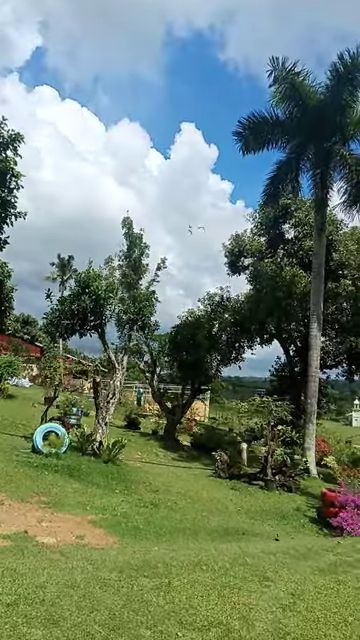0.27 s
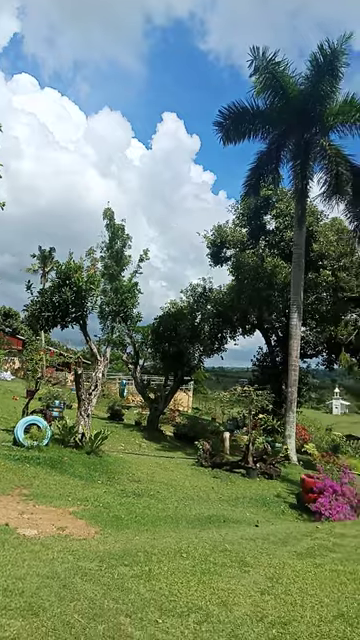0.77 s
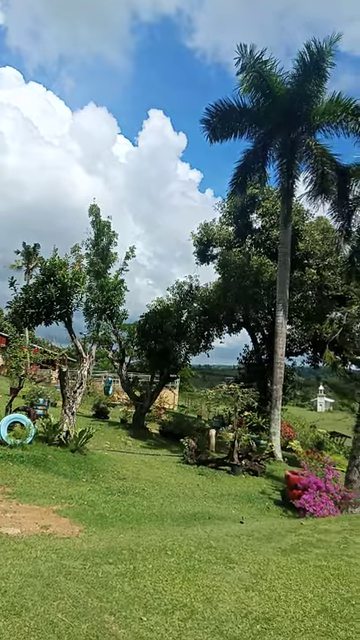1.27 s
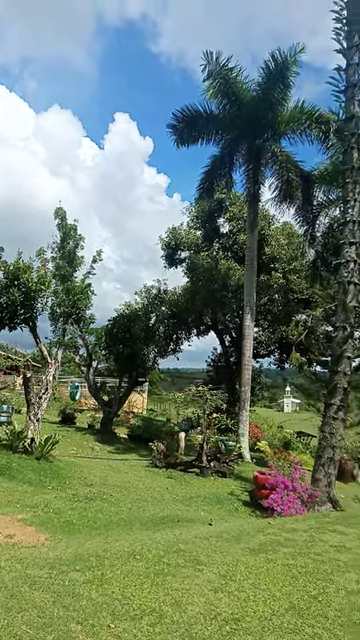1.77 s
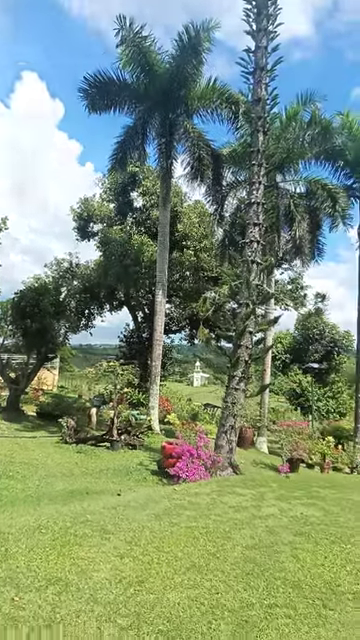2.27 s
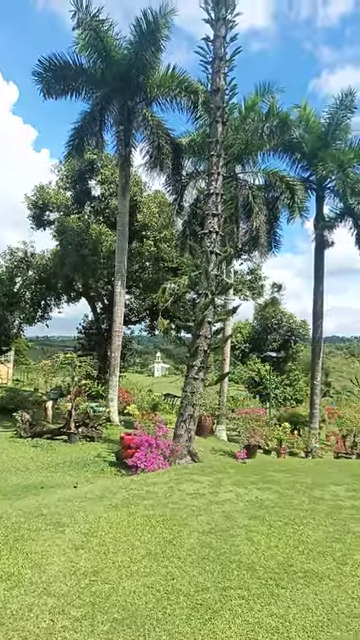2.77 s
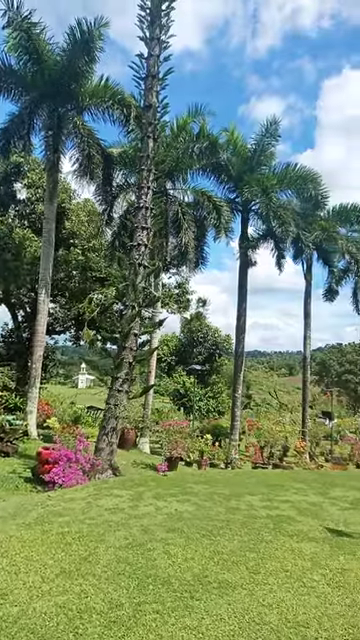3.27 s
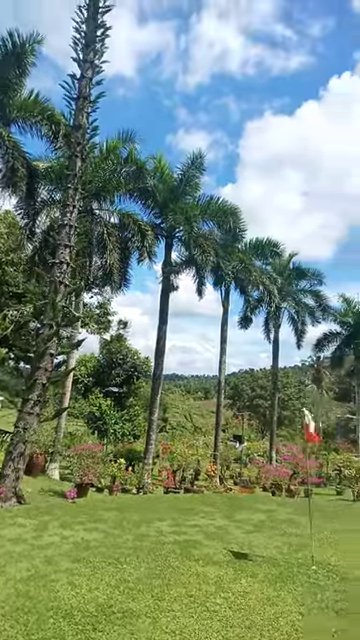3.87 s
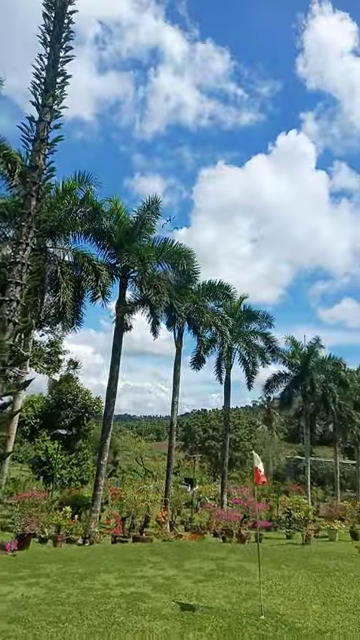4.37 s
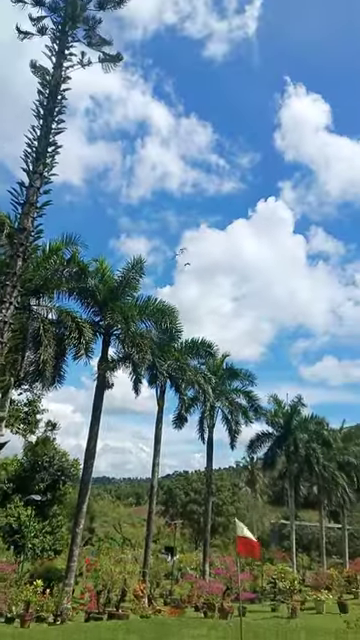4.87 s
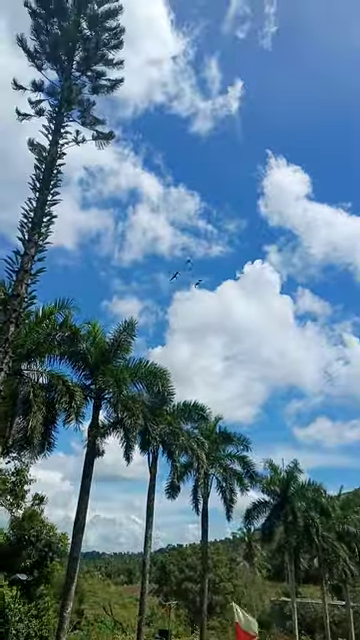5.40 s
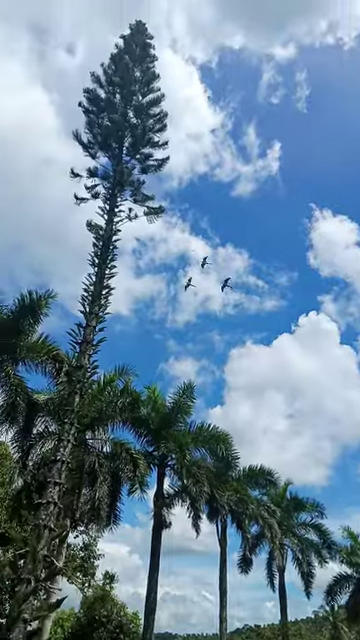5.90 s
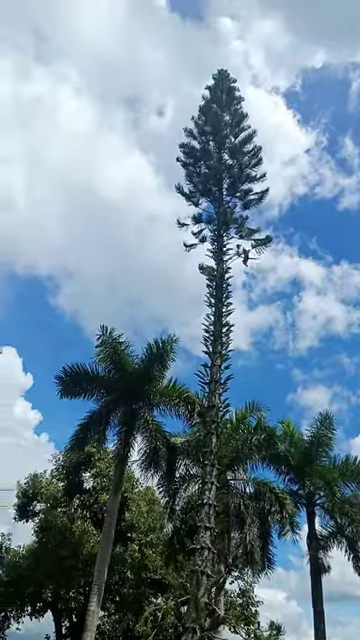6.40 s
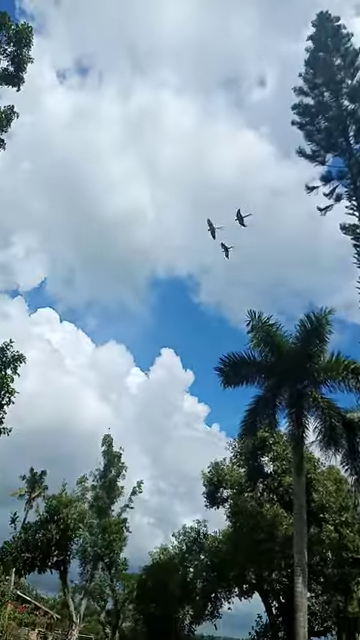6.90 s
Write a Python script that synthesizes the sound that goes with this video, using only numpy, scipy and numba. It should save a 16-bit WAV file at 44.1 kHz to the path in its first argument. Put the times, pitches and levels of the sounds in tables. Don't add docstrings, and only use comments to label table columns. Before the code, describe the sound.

Harsh parrot screeches and grating squawks ring out overhead outdoors, over low wind buffeting, soft leaf rustle and a faint distant hum.

```python
import sys
import numpy as np
from scipy import signal
from scipy.fft import rfft, irfft
from scipy.io import wavfile
from scipy.ndimage import uniform_filter1d, minimum_filter1d
from numba import njit

SR = 44100
rng = np.random.default_rng(int(sys.argv[2]) if len(sys.argv) > 2 else 0)


def transcribe(u):
    v = np.clip(np.atleast_2d(u).T, -1, 1)
    q = np.round(v * 32767).astype(np.int16)
    wavfile.write(sys.argv[1], SR, q)


def amplitude_ratio(level_db):
    exponent = np.asarray(level_db, float) / 20
    return 10 ** exponent


N = 315178
T = np.arange(N) / SR

# t/s, level/dB
WIND = [(0, -41.5), (.6, -42.5), (1.6, -39.5), (2.3, -41.5), (2.6, -40.5), (3.4, -45.5), (3.5, -34.5),
        (4.1, -40), (4.5, -33), (5.2, -34), (5.7, -38.5), (6.5, -33.5), (7.15, -38)]
# t/s, level over the wind/dB, half width/s
BUFFETS = [
    (4.4, 5.5, 0.04),
    (4.54, 7, 0.1),
    (5.49, 10.5, 0.11),
    (5.75, 10, 0.15),
    (6.18, 14, 0.16),
    (6.89, 10.5, 0.22),
]
# f/Hz, level/dB
RUMBLE = [(12, -61), (20, -26), (37, -26.5), (54, -7.5), (75, 3.5), (147, 1), (195, -6), (354, -23),
          (600, -18), (780, -33.5), (1320, -120)]
# t/s, level over the leaves/dB, half width/s
RUSTLES = [
    (2.31, 5.5, 0.23),
    (3.58, 2.5, 0.12),
    (4.5, 4.5, 0.16),
    (5.72, 4.5, 0.12),
    (6.42, 5.5, 0.19),
    (7.05, 2, 0.08),
    (5.3, -2.5, .2),
]
# f/Hz, level/dB
LEAVES = [(150, -11.5), (250, -3.5), (700, -5.5), (1400, -5.5), (2200, -7), (2800, -6), (3300, -12),
          (4200, -17.5), (5000, -36), (6000, -41), (8000, -51.5), (15500, -68.5)]
# t/s, length/s, f/Hz, level/dB, glide/Hz
WHISTLES = [
    (0.032, .17, 1660, -39.5, 76),
    (0.184, 0.22, 1430, -34.5, -38.5),
    (0.312, 0.15, 1760, -39.5, -75.5),
    (1.745, .22, 1615, -30, -39),
    (4.072, .09, 4240, -32, -500),
    (6.5, 0.29, 1195, -43, 0),
]
# t/s, length/s, pulse rate/Hz, throat f/Hz, level/dB
CROAKS = [
    (0.52, 0.59, 123.8, 1895, -28.5),
    (2.567, 0.26, 73.4, 1790, -35),
    (4.601, .5, 117.5, 2090, -29.5),
]
# t/s, level/dB
CLACKS = [
    (3.666, -22.5),
    (4.301, -22),
    (5.88, -17.5),
    (6.394, -10.5),
    (6.964, -17.5),
]
# t/s, length/s, level/dB, throat f/Hz, beak level/dB
RASPS = [(0.975, 0.021, -25, 2080, -7), (0.997, 0.34, -15.5, 2355, -11), (2.24, 0.57, -35, 2458, -18),
         (3.502, .165, -33.5, 2310, -10.5), (3.664, 0.31, -15.5, 2460, -19), (3.997, .2, -37.5, 2158, 2),
         (4.299, 0.3, -15.5, 2448, -21.5), (4.658, 0.098, -30.5, 2200, -2.5),
         (5.631, .22, -36.5, 2440, -3.5), (5.882, 0.086, -20.5, 2324, -13.5),
         (6.017, 0.18, -17.5, 2310, -10.5), (6.366, 0.028, -18.5, 2450, -4.5),
         (6.395, 0.25, -15, 2378, -10), (6.959, 0.1, -15, 2513, -11.5), (7.101, .06, -13, 2432, -9.5)]
# t/s, length/s
LOCKS = [
    (3.76, .05),
    (4.39, .055),
    (6.07, .09),
    (6.57, .04),
]
BEAK_RANGE_HZ = [1683, 4160]
# t/s, pitch f/Hz, level/dB, beak opening/dB
LONG_SCREAMS = [
    [(0.0, 1298, -11, -15), (0.016, 1242, -12, -1.5), (0.088, 1241, -14, 2.5), (0.1, 1339, -21.5, 1.5),
     (0.196, 1300, -18, 5), (0.21, 1024, -16.5, 0.5), (0.235, 916, -41, 6.5)],
    [(1.575, 1065, -22.5, -4.5), (1.618, 1267, -21, 5), (1.71, 1267, -26.5, 11), (1.76, 1169, -14, -6),
     (1.9, 1113, -14, -6.5), (1.95, 1030, -20.5, -6), (2.05, 981, -26.5, 1), (2.198, 910, -28.5, -8.5),
     (2.22, 734, -34, 4)],
    [(2.862, 937, -35.5, 17), (2.882, 1103, -11.5, -10.5), (2.902, 1177, -13, 0.5), (3.0, 1151, -13.5, -5),
     (3.088, 1151, -11, -9.5), (3.192, 1062, -18.5, -2), (3.25, 1075, -17.5, -5), (3.28, 992, -30, 5),
     (3.3, 778, -35, 1.5)],
]
SHORT_SCREAMS = [
    [(2.8, 649, -38.5, -1.5), (2.826, 712, -23.5, 3.5), (2.833, 754, -14, -8.5), (2.862, 887, -24, 5.2)],
    [(3.97, 1066, -34.5, 10), (4.05, 1018, -34, 14.5), (4.17, 997, -36, 15.5), (4.21, 928, -44.5, 21),
     (4.27, 870, -55.5, 18)],
    [(5.965, 1103, -27, 1), (5.991, 1149, -19, -1.5), (6.02, 1110, -17.5, -9)],
    [(6.15, 1040, -35.5, 14.5), (6.21, 1020, -35, 14.5), (6.384, 1014, -27, 11), (6.4, 1017, -43, 1.5)],
    [(7.04, 1167, -16, -5), (7.074, 1150, -10, -15), (7.098, 1163, -14.5, -4), (7.115, 1216, -9, -19)],
]
# roughness/0-1, tremor depth/0-1, odd partials level/dB
SCREAM_ROUGH = [(.15, .15, 0), (.08, 0, 0), (.06, 0, 0), (.15, 0, 0), (.2, .4, -14), (.1, .1, 0),
                (.17, .45, -14), (.1, .1, 0)]
# f/Hz, level/dB
THROAT = [(1300, -29), (1600, -23), (1830, -1.1), (2700, 1.64), (3100, -15.5), (3600, -10), (4150, -11),
          (4700, -30)]
# f/Hz, level/dB
UPPER = [(4300, 33), (4750, 29), (5150, 10), (5800, 6.5), (6400, 2), (7200, 3), (8500, 1), (10000, -11.5),
         (12000, -12), (15500, -23)]

BEAK_HZ, TOP_HZ = 3424, 6020


def unit(x):
    return x / np.sqrt(np.mean(x ** 2) + 1e-18)


def play(table, fade=0.002):
    s, *columns = np.transpose(table)
    i = np.arange(int(max(s[0], 0) * SR), min(int(s[-1] * SR), N))
    since_start = T[i] - s[0] + (s[0] < .02)
    until_end = s[-1] - T[i] + (s[-1] > T[-1] - .02)
    edge = np.clip(np.minimum(since_start, until_end) / fade, 0, 1)
    return i, [np.interp(T[i], s, c) for c in columns], edge


def span(start, length, fade):
    i, (t,), edge = play([(start, 0), (start + length, length)], fade)
    return i, t, edge


def walk(rate, size):
    k = max(int(SR / rate), 1)
    noise = rng.standard_normal(N + 1)[:size]
    return unit(uniform_filter1d(uniform_filter1d(noise, k), k))


def hiss(size):
    return rng.standard_normal(N)[:size]


def tone(hz):
    return np.sin(2 * np.pi * np.cumsum(hz) / SR)


def bumps(rows):
    return sum(db * np.exp(-((T - s) / width) ** 2) for s, db, width in rows)


def spectrum_db(points, hz):
    f, db = np.transpose(points)
    return np.interp(np.log(hz + 1), np.log(f), db)


def bands(points, flicker_db, rate):
    hz, out = np.arange(N // 2 + 1) * SR / N, 0
    noise = rfft(rng.standard_normal(N)) * amplitude_ratio(spectrum_db(points, hz))
    for centre in np.arange(4, 14.5, .5):
        share = np.clip(1 - 2 * np.abs(np.log2(hz + 1) - centre), 0, 1)
        out = out + irfft(noise * share, N) * amplitude_ratio(flicker_db * walk(rate, N))
    return unit(out)


@njit
def svf(x, hz, width):
    y, b, l = np.empty(len(x)), 0., 0.
    for i in range(len(x)):
        g, k = np.tan(np.pi * hz[i] / SR), width / hz[i]
        v = (b + g * (x[i] - l)) / (1 + g * (g + k))
        b, l, y[i] = 2 * v - b, l + 2 * g * v, k * v
    return y


def ring(x, hz, width_hz):
    hz = hz + np.zeros(len(x))
    once = svf(x, hz, 1. * width_hz)
    return unit(svf(once, hz, 1. * width_hz))


def pulses(hz, jitter, scatter_db):
    chance = rng.standard_normal((N // 20, 2)).T
    cycle = np.cumsum(hz / SR)
    due = np.arange(1, int(cycle[-1])) + 0.
    count = len(due)
    drift = np.cumsum(jitter * chance[0, :count]) * 0.33
    due += drift + jitter * chance[0, 1:count + 1]
    at = np.interp(due, cycle, np.arange(len(hz)) + 0.)
    out, whole = np.zeros(len(hz) + 1), at.astype(int)
    size = amplitude_ratio(scatter_db * chance[1, :count])
    np.add.at(out, whole, size * (1 - at + whole))
    np.add.at(out, whole + 1, size * (at - whole))
    return out[:-1] - out.mean()


def beak(x):
    return signal.sosfilt(signal.cheby1(4, 1, BEAK_RANGE_HZ, "bandpass", fs=SR, output="sos"), x)


def wind():
    strength = np.interp(T, *np.transpose(WIND))
    hum = ring(rng.standard_normal(N), 69., 7)
    rumble = bands(RUMBLE, 2.5, 12) + amplitude_ratio(-9) * hum
    leaf_db = -31 + 0.28 * strength + bumps(RUSTLES)
    leaves = amplitude_ratio(leaf_db + 4.5) * bands(LEAVES, 0.5, 54)
    return amplitude_ratio(strength + bumps(BUFFETS) + 1.24) * rumble + leaves


def trees(x):
    t = T[:int(1.2 * SR)]
    patches = amplitude_ratio(2.5 * walk(25, len(t)))
    onset = np.clip((t - .008) / .02, 0, 1)
    noise = rng.standard_normal((2, len(t))) * patches * onset
    low_pass = signal.butter(3, 4430, fs=SR, output="sos")
    dull = signal.sosfilt(low_pass, noise[0]) * amplitude_ratio(-60 * t / 0.6)
    tail = dull + amplitude_ratio(-3) * noise[1] * amplitude_ratio(-60 * t / .5)
    sway = .86 + .5 * walk(350, N)
    return amplitude_ratio(-9.5) * signal.fftconvolve(x * sway, tail / np.sqrt(np.sum(tail ** 2)))[:N]


def whistles():
    out = np.zeros(N)
    for start, length, hz, db, glide_hz in WHISTLES:
        i, t, edge = span(start, length, 0.015)
        end = (t / length) ** 4
        scoop = 0.21 * np.exp(-t / length / 0.078)
        hz = (hz + glide_hz * t / length) * (1 - scoop - 0.077 * end)
        loudness = amplitude_ratio(db - 7.5 * end + 0.63 * walk(37, len(i)))
        out[i] += np.sqrt(2) * edge * loudness * tone(hz)
    return out


def croaks():
    out = np.zeros(N)
    for start, length, rate, hz, db in CROAKS:
        i, t, edge = span(start, length, 0.055)
        hz = hz * (1 - 0.062 * length * (2 * t / length - 1) ** 2)
        width = 2.6 * rate
        beat = pulses(rate * (1 - .05 * t / length), .005, 1.)
        puff = unit(uniform_filter1d(beat, size=200) * hiss(len(i)))
        core, rough = unit(beat) + .25 * puff, unit(beat) + 1.1 * puff
        voice = ring(core, hz, width) + amplitude_ratio(-3) * ring(rough, 1.24 * hz, 1000)
        voice = voice + amplitude_ratio(-28.0) * ring(rough, BEAK_HZ, 900)
        out[i] += edge * amplitude_ratio(db) * (beak(voice) + amplitude_ratio(-44.0) * ring(rough, TOP_HZ, 2200))
    return out


def clacks():
    out = np.zeros(N)
    for start, db in CLACKS:
        i, t, edge = span(start, .012, .001)
        hz = 2220 + (3600 - 2220) * np.exp(-t / .004)
        out[i] += edge * amplitude_ratio(db + 4.3 * walk(1300, len(i))) * tone(hz)
    return out


def rasps():
    release = .17
    swing_start, swing_held, swing_locked = .22, .11, .025
    out = np.zeros(N)
    locked = sum((T > s) & (T < s + length) for s, length in LOCKS)
    locked = uniform_filter1d(locked + 0., size=600)
    for start, length, db, hz, beak_db in RASPS:
        i, t, edge = span(start, length * (1 + release), .0015)
        young = np.exp(-t / 0.052)
        db = db - 2 * young - 26 * np.maximum(t / length - 1, 0) / release
        hz = hz * (1 - 0.0298 * young)
        top_db = -33.5 + 0.35 * beak_db - 4.5 * young
        unrest = swing_held + (swing_start - swing_held) * np.exp(-t / .12)
        settled = np.minimum(np.cumsum(locked[i]) / 500, 1)
        hz = hz * (1 - .045 * (settled[-1] - settled))
        db = db + 2.5 * locked[i]
        unrest = unrest * (1 - .2 * settled)
        unrest = unrest + (swing_locked - unrest) * locked[i]
        fold = np.tanh(ring(hiss(len(i)), 95.55, 50)) + .3 * walk(700, len(i))
        flutter = amplitude_ratio((2 + 12 * unrest) * np.tanh(walk(300, len(i))))
        source = unit(pulses(hz / 2 * (1 + unrest * fold), .01, 1.5)) * flutter
        airy = source + .7 * flutter * hiss(len(i))
        throat = ring(source, hz + 30, 1250)
        main = beak(throat + amplitude_ratio(beak_db) * ring(airy, BEAK_HZ + 200, 1400))
        main = main + amplitude_ratio(-29.5) * ring(airy, hz * 0.54, 820)
        top = ring(airy, TOP_HZ, 820) + amplitude_ratio(-11) * ring(airy, 8200., 1800)
        top = top + amplitude_ratio(-17.0) * ring(airy, 11500., 4000)
        top = unit(top) + amplitude_ratio(7.0) * ring(airy, 4720.0, 920)
        out[i] += edge * amplitude_ratio(db) * (main + amplitude_ratio(top_db) * top)
    return out


def screams():
    out = np.zeros(N)
    for table, (rough, tremor, odd_db) in zip(LONG_SCREAMS + SHORT_SCREAMS, SCREAM_ROUGH):
        i, (hz, level, opening), edge = play(table, 0.0013)
        n = len(i)
        glide = uniform_filter1d(np.abs(np.gradient(np.log(hz))) * SR, size=300)
        rough = rough + .034 * glide
        wobble = .04 * rough * walk(500, n) + .004 * walk(22, n)
        phase = 2 * np.pi * np.cumsum(hz * (1 + wobble)) / SR
        low = 0
        for k in range(1, 5):
            db = level + spectrum_db(THROAT, k * hz) + odd_db * (k % 2)
            db = db + opening * np.clip((k * hz - 2700) / 300, 0, 1)
            low = low + amplitude_ratio(db + 10 * rough * walk(200, n)) * np.sin(k * phase)
        upper_db = level - 47 + opening - 23 * np.maximum(rough - .25, 0)
        high = 0
        for k in range(5, 14):
            db = upper_db + spectrum_db(UPPER, k * hz) + odd_db * (k % 2) / 2
            db = db + 6 * walk(12, n) - 60 * (k * hz > 16000)
            high = high + amplitude_ratio(db) * np.sin(k * phase)
        breath = np.minimum(.1 + 2.5 * rough, 1)
        high = high * (1 - breath + breath * walk(350, n))
        shake = 1 + tremor * np.sin(2 * np.pi * 68.6 * T[i])
        out[i] += np.sqrt(2) * edge * (low + high) * shake
    return out


def scene():
    birds = screams() + rasps() + clacks() + croaks() + whistles()
    return (birds + trees(birds) + wind())[None]


def roll_off(x):
    return signal.sosfilt(signal.butter(12, 15500, fs=SR, output="sos"), x)


def record(dry):
    room_left = np.minimum(.85 / (np.abs(dry) + 1e-9), 1)
    gain = uniform_filter1d(minimum_filter1d(room_left, size=401), size=201)
    return roll_off(gain * dry)


dry = scene()
out = record(dry)
transcribe(out)
```